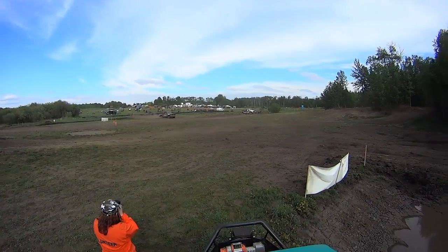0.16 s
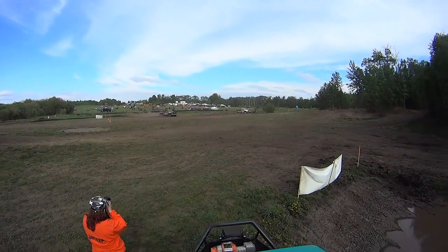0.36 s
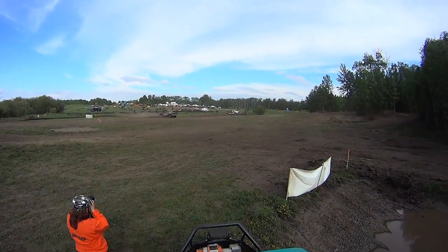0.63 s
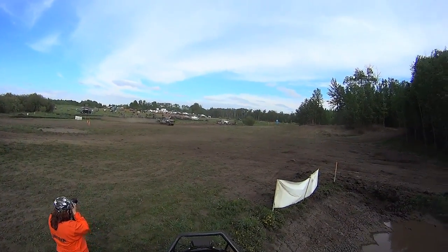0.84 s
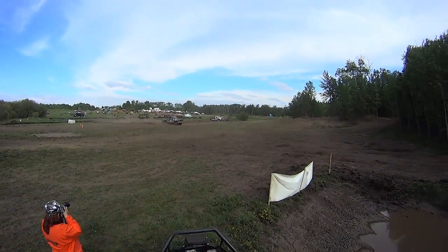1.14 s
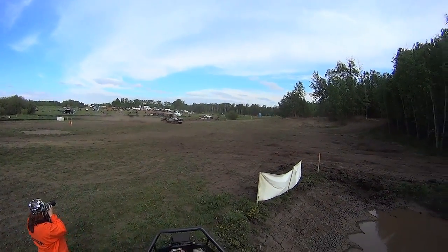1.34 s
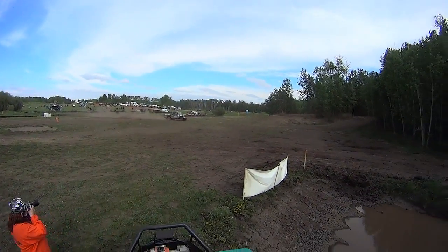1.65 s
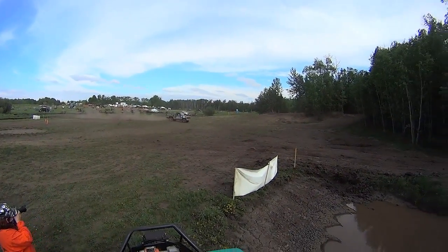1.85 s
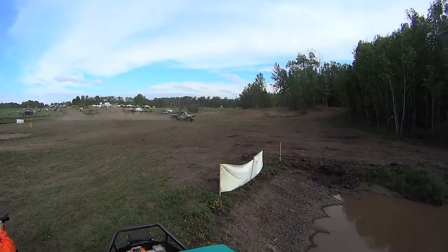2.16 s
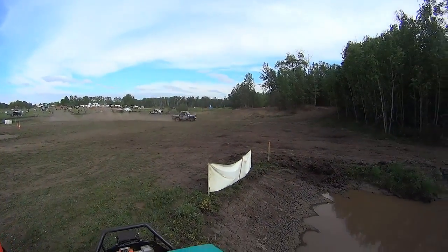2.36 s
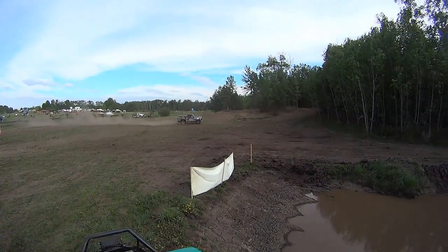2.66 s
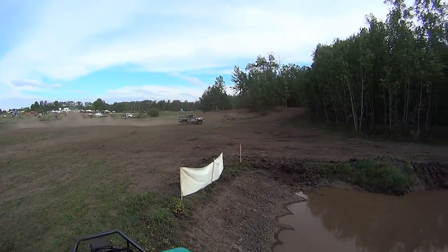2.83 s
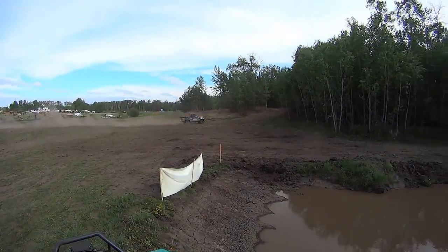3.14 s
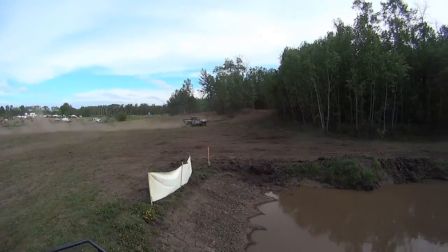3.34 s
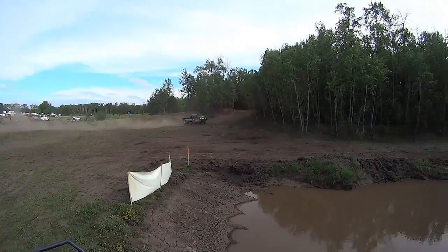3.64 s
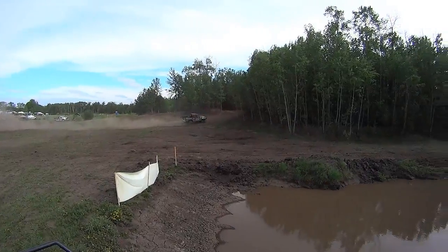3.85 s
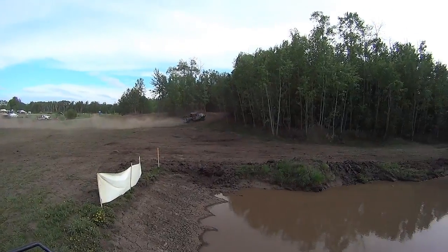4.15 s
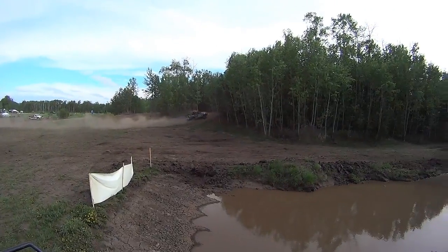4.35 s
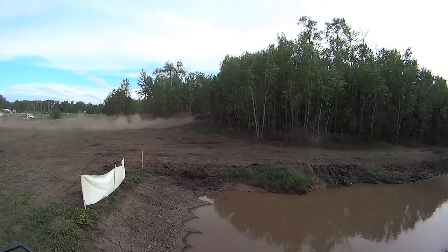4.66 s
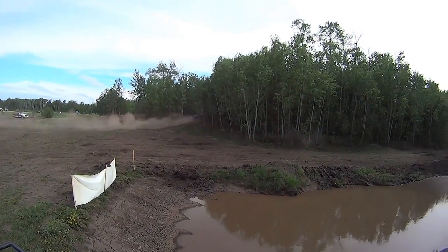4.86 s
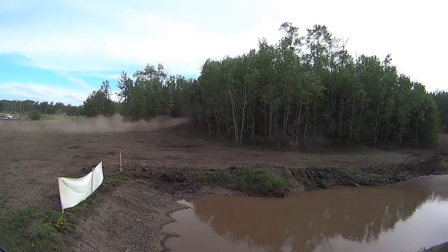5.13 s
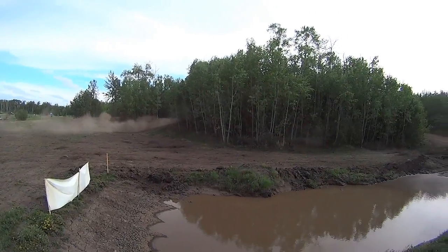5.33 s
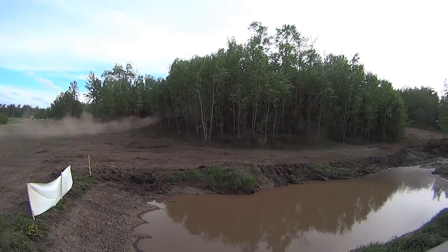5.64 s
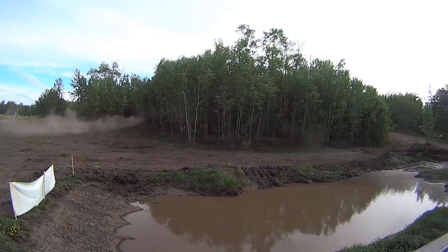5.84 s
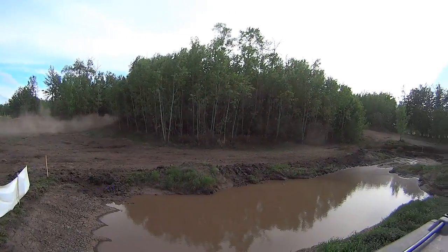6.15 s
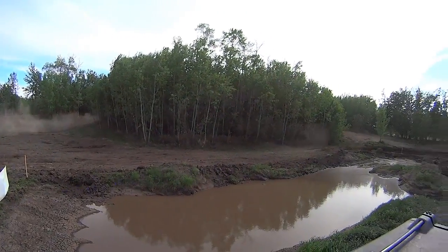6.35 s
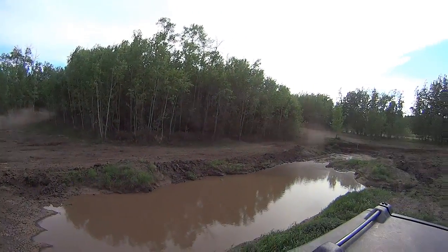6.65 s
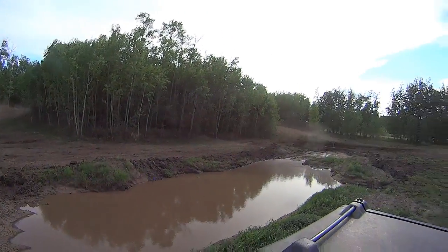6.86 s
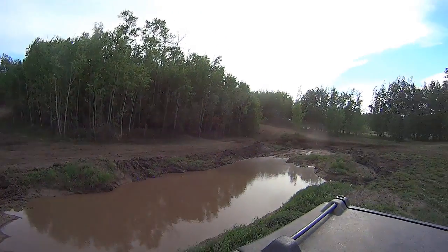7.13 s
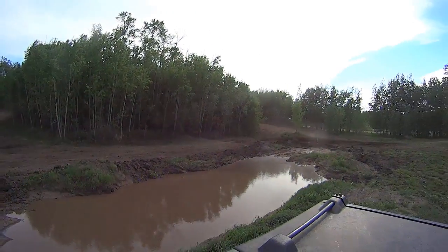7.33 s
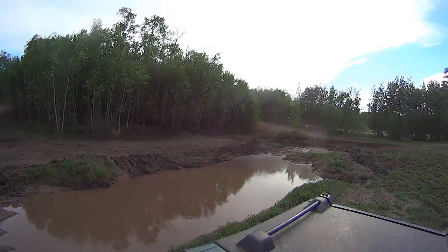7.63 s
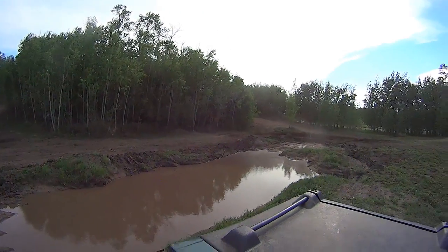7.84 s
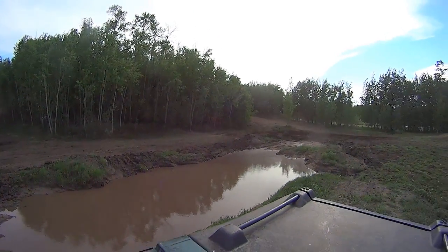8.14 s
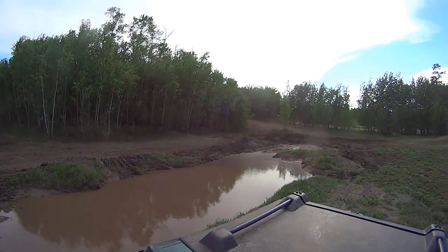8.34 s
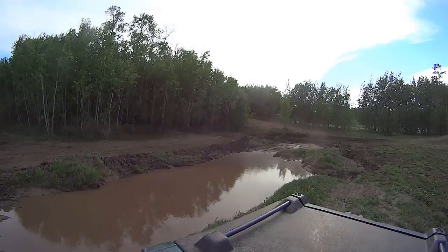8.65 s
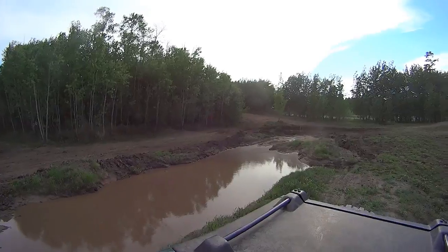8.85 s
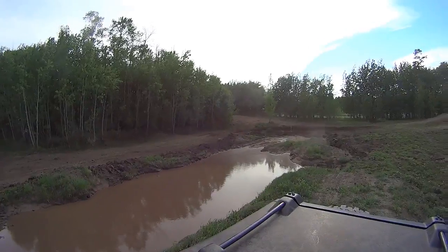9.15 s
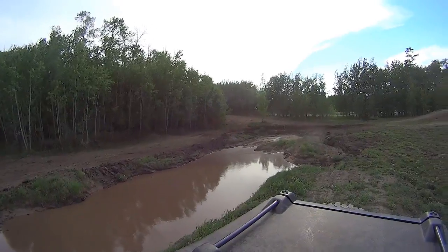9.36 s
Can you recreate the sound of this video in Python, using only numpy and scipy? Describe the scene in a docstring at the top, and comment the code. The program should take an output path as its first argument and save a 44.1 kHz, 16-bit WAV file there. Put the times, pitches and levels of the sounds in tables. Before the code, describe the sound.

A distant off-road engine revs loudly, eases briefly with a faint whine, and bursts back with sharp exhaust barks. It then lifts, sinking in pitch with a short weak push, and runs on muffled behind trees until it fades. The sound is coloured and boxy, through a closed stereo housing, with quiet hiss, several bumps on the casing, and late scraping and rumbling from a hand.

```python
"""Across a field beside a grove, a big off-road race engine revs, lifts and revs again, then runs on by the trees.
Its low drone is a stack of wavering tones; its rasp is noise pulsed by the exhaust puffs, plus a growl.
Two microphone ports in a closed housing colour the rasp; a steady bed of air and hiss lies underneath.
Knocks ring and thud on the housing, a faint whine arches once, and near the end a hand rubs the housing."""
import sys
import numpy as np
from scipy import signal
from scipy.fft import rfft, irfft, next_fast_len
from scipy.io import wavfile
from scipy.ndimage import uniform_filter1d

SR = 44100
rng = np.random.default_rng(int(sys.argv[2]) if len(sys.argv) > 2 else 0)


def put_to_file(sound):
    """Save the sound as 16-bit audio at rate SR, in the file named by the first command-line argument."""
    columns = np.atleast_2d(sound).T  # one column per channel
    safe = np.clip(columns, -1, 1)
    whole_steps = np.round(safe * 32767)
    wavfile.write(sys.argv[1], SR, whole_steps.astype(np.int16))


N = 418509  # length in samples
SIZE = next_fast_len(N)
BINS = np.fft.rfftfreq(SIZE, 1 / SR)  # frequencies of the whole-length spectrum, Hz

# engine speed; every cylinder fires once a cycle: t/s, full cycles per second/Hz
ENGINE_SPEED = [(0.0, 22.52), (0.75, 24.13), (0.93, 25.41), (1.42, 25.28), (1.52, 23.96), (1.65, 24.47),
                (1.79, 23.04), (1.93, 20.03), (2.14, 18.65), (2.28, 21.25), (2.5, 21.96), (2.63, 23.63),
                (2.77, 24.38), (2.85, 25.23), (2.94, 23.91), (3.06, 24.72), (3.2, 24.02), (3.34, 23.74),
                (3.47, 19.82), (3.54, 19.06), (3.68, 19.96), (3.82, 19.92), (3.9, 18.92), (4.08, 18.31),
                (4.18, 20.0), (4.4, 19.39), (4.6, 17.28), (4.95, 16.05), (5.08, 17.36), (5.2, 17.15),
                (5.45, 18.6), (5.75, 17.87), (5.92, 15.97), (6.1, 17.32), (6.4, 19.61), (7.3, 20.33),
                (8.15, 21.19), (8.5, 20.98)]
# pushes on the throttle with coasting between: t/s, rasp level/dB before its colouring, drone level/dB
THROTTLE_LEVELS = [(0.0, -35.5, -36.5), (0.28, -29, -33), (1.15, -25.5, -31), (1.3, -26, -29),
                   (1.55, -35, -29), (1.82, -40.5, -32.5), (1.95, -39.5, -43.5), (2.2, -44, -39.5),
                   (2.3, -48, -36), (2.5, -45.5, -39), (2.66, -29, -30), (3.05, -25.5, -28),
                   (3.33, -34.5, -32.5), (3.42, -44.5, -43.5), (3.85, -46.5, -44.5), (4.41, -56, -49.5),
                   (4.9, -58, -46.5), (5.05, -42, -42.5), (5.34, -42, -46), (5.45, -55, -55),
                   (5.72, -60.5, -50), (6.0, -68.5, -59), (6.1, -50, -47), (6.2, -41, -46.5),
                   (6.8, -36, -43.5), (8.2, -37, -44), (8.42, -42, -35.5), (8.7, -52.5, -51),
                   (8.9, -48, -45), (9.1, -56, -34), (9.49, -66, -44)]
# how alike the ports hear the engine: f/Hz, likeness/1 (below zero they move in opposition)
PORT_LIKENESS = [(105, .98), (135, .9), (240, .45), (400, .15), (700, .35), (950, .55), (1300, .96),
                 (2450, .95), (2750, .5), (3150, .75), (3650, -.8), (4200, -.1), (4750, .92), (5250, .9),
                 (5700, -.75), (7000, -.6), (9000, .2)]
# which port hears the engine louder: f/Hz, left minus right/dB
PORT_LEAN = [(60, 0), (110, -0.5), (190, -1.5), (340, -1.5), (600, 3), (1070, 5.5), (1500, 4.5), (1910, 6),
             (2450, 7), (2830, -8), (3150, 1.5), (3550, 10), (4300, -2), (6040, 0), (10700, -2)]


def gain_of(db):
    """Turns decibels into a factor on the sound wave."""
    return 10 ** (np.asarray(db) / 20)


def evened(x):
    """Scales a signal to an average strength (rms) of 1."""
    return x / np.sqrt(np.mean(x ** 2) + 1e-20)


def read(points, hz):
    """Reads a frequency table between its points, on a log-frequency axis."""
    f, value = np.transpose(points)
    return np.interp(np.log(hz + 1), np.log(f + 1), value)


def columns(rows, t):
    """Reads every column of a time table at the times t."""
    s, *rest = np.transpose(rows)
    return [np.interp(t, s, c) for c in rest]


def drift(hz):
    """Slow random wander of rms 1: noise smoothed so that little faster than hz remains."""
    step = 64  # samples between the coarse points
    keep = np.exp(-2 * np.pi * hz * step / SR)
    noise = rng.standard_normal(N // step + 2)
    coarse = signal.lfilter([1], [1, -2 * keep, keep * keep], noise)
    return evened(np.interp(np.arange(N) / step, np.arange(len(coarse)), coarse))


def filtered(x, gain):
    """Makes each frequency louder or softer by its own gain, over the whole length."""
    return irfft(rfft(x, SIZE) * gain, SIZE)[..., :N]


def port_pair(a, b, same, lean_db=0):
    """The ports share part of a sound, later at the right; the right port also has a part of its own."""
    # delay of the shared part at the right port: f/Hz, lag/rad
    right_lag = [(60, 0), (250, .6), (780, 1.4), (1030, .1), (1500, .3), (1750, .7), (2300, .15),
                 (3100, .7), (4700, .5), (5000, 0)]
    a, b, same = rfft(a, SIZE), rfft(b, SIZE), np.clip(same, -1, 1)
    shared = same * a * np.exp(-1j * read(right_lag, BINS))
    right = shared + np.sqrt(1 - same ** 2) * b
    return irfft([a * gain_of(lean_db / 2), right * gain_of(-lean_db / 2)], SIZE)[:, :N]


def by_place(t):
    """The trees change the rasp: 1.25 kHz dB, top treble dB, bark depth and 1.5 kHz dB at the times t."""
    # where the truck is: t/s, place/1 (0 open field, 1 edge of the grove, 2 fully behind)
    path = [(3.6, 0.04), (4.2, 1.13), (6.1, 1.03), (6.4, 1.1)]
    # rows open, edge, behind: 1.25 kHz level/dB, top treble level/dB, bark depth/1, 1.5 kHz level/dB
    place_colour = [(-5, 15.5, 0.52, 2), (14, -4, 0.34, 3), (-23.5, 10, 0, -21.5)]
    place = columns(path, t)[0]
    return [np.interp(place, [0, 1, 2], c) for c in np.transpose(place_colour)]


def turns():
    """Engine cycles counted since the start: the running sum of the engine speed."""
    return np.cumsum(columns(ENGINE_SPEED, np.arange(N) / SR)[0]) / SR


def drone(size=16):
    """Exhaust orders, whole multiples of the cycle rate, sound as wavering tones of changing balance."""
    # orders heard as tones: multiple of the cycle rate/1
    orders = [3, 4, 5, 6, 7, 8, 9, 10, 11, 12, 13]
    # balance of these orders in each named stage of the drive: relative level/dB per order
    stage_balance = { "pulling away": [-37, -36, -7, -3.5, -1.5, -2.5, -3, -14, -7.5, -13, -22], "flat out":
                     [-36, -38, -0.5, -5.5, -5.5, -2, -4, -16, -11.5, -21.5, -25], "coasting": [-21, -16,
                     -3.5, -0.5, -8, -36, -8, -2, -11, -20, -9], "coasting again": [-16, -16, -2.5, -2, -6,
                     -20, -8, -8.5, -10.5, -17, -11.5], "picking up": [-25, -27, -6, -3.5, -8.5, -12.5, -12,
                     -14, -8.5, -16, -23], "swinging to the grove": [-26, -17, -3, -5, -1, -14, -9, -9, 1,
                     0, -12], "slowing at the edge": [-25, -27, -10, -10, 1, 2.5, -15, -19, -12, -10, -11],
                     "short push": [-28, -23, -2, -1, -1, -17, -20, -20, -5, -31, -21], "coasting far":
                     [-15, -19, -16, 3, -13, -22, -28, -19, -25, -27, -27], "behind the grove": [-30, -27,
                     -2, -15.5, -11, -13.5, -5, -12, -2.5, -12.5, -11]}
    # when each stage holds; the balance blends over the gaps: start/s, end/s, stage name (in the last stage, so
    # named, the truck is only just past the edge of the grove)
    drive_stages = [(0, .6, "pulling away"), (.9, 1.7, "flat out"), (1.92, 2.17, "coasting"),
                    (2.28, 2.52, "picking up"), (2.68, 3.35, "flat out"), (3.47, 4.05, "coasting again"),
                    (4.17, 4.42, "swinging to the grove"), (4.58, 4.96, "slowing at the edge"),
                    (5.07, 5.4, "short push"), (5.55, 6.1, "coasting far"),
                    (6.22, 9.49, "behind the grove")]
    t = np.arange(0, N, size) / SR  # bass needs only a coarse time grid
    cycle = turns()[::size]
    speed = columns(ENGINE_SPEED, t)[0]
    balance = [(s, *stage_balance[stage]) for start, end, stage in drive_stages for s in (start, end)]
    out, power = 0, 0
    for k, db in zip(orders, columns(balance, t)):
        phase = 2 * np.pi * (k * cycle + rng.random()) + .12 * drift(6)[::size]
        lead = np.arccos(read(PORT_LIKENESS, k * speed))  # less alike: further apart in phase
        lean_db = read(PORT_LEAN, k * speed)
        left = np.cos(phase) * gain_of(lean_db / 2)
        right = np.cos(phase - lead) * gain_of(-lean_db / 2)
        out = out + gain_of(db + 1.3 * drift(4)[::size]) * np.array([left, right])
        power = power + gain_of(db) ** 2 / 2
    fade = np.clip((8.55 - t) / 0.3, 0, 1)  # the engine note dies away by the grove
    out = out / np.sqrt(power) * gain_of(columns(THROTTLE_LEVELS, t)[1]) * fade
    return signal.resample_poly(out, size, 1, axis=1)[:, :N]


def puffs():
    """Gas flow at the pipes: eight uneven firings a cycle, one bank louder, and single sharp barks."""
    # share of each cylinder in the bark, in firing order: level/dB at full bark depth
    cylinder_share = [0, -1.5, -7, -12, -13, -16, -7, -3]
    # sharp barks that stand out: t/s, level/dB
    sharp_barks = [(0.44, -35), (0.886, -24), (1.285, -27.5), (1.908, -37), (2.58, -34), (2.663, -24),
                   (2.713, -19.5), (2.912, -43), (3.085, -51), (3.118, -27), (3.159, -22.5), (3.431, -35),
                   (3.468, -31), (3.721, -45), (3.773, -34.5), (3.832, -35), (3.876, -43), (3.927, -38.5),
                   (4.195, -43), (5.045, -46), (5.142, -43), (5.218, -39), (5.33, -49)]
    t = np.arange(N) / SR
    depth = by_place(t)[2]
    first_firing = 0.18  # place in the firing order at the start
    firing = 8 * (turns() + 1) + first_firing + 0.056 * drift(21)
    index = firing.astype(int)
    uneven_db = 1.8 * rng.standard_normal(index.max() + 1)
    puff_db = depth * (np.take(cylinder_share, index % 8) + uneven_db[index])
    pulse = 1 + depth * np.exp(-(firing % 1) / .35)  # each puff starts sharply and sinks
    flow = uniform_filter1d(gain_of(puff_db) * pulse, 12)
    # even out the strength over a sixth of a second, then follow the throttle
    flow *= gain_of(columns(THROTTLE_LEVELS, t)[0]) / np.sqrt(uniform_filter1d(flow ** 2, SR // 6))
    bark = np.exp(-t[:1500] / 0.0075) * np.minimum(t[:1500] / .0015, 1)
    for s, db in sharp_barks:
        flow[round(s * SR):][:1500] += gain_of(db) * bark
    return flow


def growl(first=14, count=26):
    """Upper exhaust orders: one cycle of pressure, repeated at engine speed and following the throttle."""
    cycle, k = np.arange(1025) / 1024, np.arange(count)[:, None] + first
    shapes = []
    for _ in range(2):  # one pressure shape for each port
        strength = rng.rayleigh(1, k.shape) / k
        waves = strength * np.cos(2 * np.pi * (k * cycle + rng.random(k.shape)))
        shapes.append(waves.sum(0))
    position = (turns() + .002 * drift(5)) % 1
    t = np.arange(N) / SR
    level = gain_of(columns(THROTTLE_LEVELS, t)[0] - 7) * by_place(t)[2]  # trees blur it
    return level * evened(np.array([np.interp(position, cycle, shape) for shape in shapes]))


def smooth_noise(shape, hz_bins, frames):
    """Random patches over frequency and time, smoothed along both and scaled to rms 1."""
    across = uniform_filter1d(rng.standard_normal(shape), size=hz_bins, axis=0)
    return evened(uniform_filter1d(across, size=frames, axis=1))


def path_colour(jets):
    """The turning truck, ground echo, trees and random patches keep changing the balance of the rasp."""
    # as the truck turns: t/s, ground-echo ridge f/Hz, ridge level/dB, below 550 Hz level/dB,
    # 550-1000 Hz level/dB, near 1.4 kHz level/dB, near 5 kHz level/dB
    turning = [(0.05, 2080, 1.5, 6.5, 5, 15, -2), (0.7, 2580, 6.5, -3.5, 1, 11, 2),
               (1.3, 2410, 2.5, -8, 4, 9, 5), (1.6, 3060, 5.5, 0, 5.5, 7, 1),
               (2.05, 3340, 3, -4, 0.5, 22, -4), (2.4, 2720, 2.5, 4.5, 7.5, 22, -5.5),
               (2.8, 3200, 5.5, -5, -1.5, -5, -9), (3.05, 2550, 5, -5, -5, -15, -4),
               (3.35, 2900, 4, 3, 1, 8, 6.5), (3.8, 2580, 8, 0, -3, 8, -4.5),
               (4.5, 2150, 2, 18, 12.5, 12, -10), (5.0, 2070, 4, 6, 7.5, 0, -10),
               (5.3, 2550, 5, 6.5, 10.5, 5, 1.5), (5.8, 1960, 1, 3.5, -5, -8, -7),
               (6.3, 2660, 6.5, 0.5, -2, -2, 0), (7.0, 2730, 0.5, -4, -5, -7, -3.5),
               (7.8, 2900, 2, -1.5, -4, -14, -1.5), (8.35, 1800, 2.5, -4.5, 6, -7, -1.5),
               (8.55, 1907, 4, 4, 20, 6, -13), (8.95, 1960, 4.5, 2, 0, 1, -4.5)]
    # change of the rasp above 8 kHz: t/s, level/dB
    treble_level = [(0, -3), (1.4, -1.5), (2.5, -3), (2.85, -1), (3.0, 8), (3.08, -6), (3.2, 8.5), (3.9, 2),
                    (5.2, 1), (6.2, 9), (8.4, 12.5), (9.4, 4)]
    # change of the housing's main ring near 1.5 kHz: t/s, level/dB
    main_ring = [(0, -12.5), (.6, -2), (.95, -9), (1.5, -8.5), (2.0, -7.5), (2.8, 6), (3.6, -1.5),
                 (5.7, 2.5), (6.3, -1), (7.4, -2.5)]
    hz, t, z = signal.stft(jets, SR, nperseg=512)
    ridge_hz, ridge_db, bass_db, low_db, bell_db, high_db = columns(turning, t)
    main_db, top_db, bark_depth, ring_db = by_place(t)
    hz = hz[:, None] + 1

    def below(edge):
        return 1 / (1 + (hz / edge) ** 12)

    def above(edge):
        return 1 / (1 + (edge / hz) ** 12)

    shift_db = bass_db * below(540) + low_db * above(613) * below(1035)
    shift_db += bell_db * above(1360) * below(1420)
    shift_db += main_db * above(1116) * below(1440) + ring_db * above(1370) * below(1710)
    shift_db += high_db * above(4130) * below(5950)
    shift_db += (top_db + columns(treble_level, t)[0]) * above(8570)
    shift_db += ridge_db * np.exp(-((hz - ridge_hz) / 300) ** 2)  # direct sound and ground echo add up here
    shift_db += columns(main_ring, t)[0] * np.exp(-((hz - 1490) / 110) ** 2)
    shift_db += 2.25 * smooth_noise(z.shape[1:], 3, 20)  # random patches of the rasp grow louder and softer
    shift_db += 2.2 * bark_depth * smooth_noise(z.shape[1:], 6, 4) * above(1000)  # quick changes of colour
    return signal.istft(z * gain_of(shift_db), SR, nperseg=512)[1][:, :N]


def rasp():
    """Turbulent noise carried by the puffs, scattered by trees and banks, heard through the housing."""
    # basic colour of the rasp: f/Hz, relative level/dB
    rasp_colour = [(150, -15.5), (300, -16.5), (430, -23.5), (760, -14), (1260, -23), (1455, 2), (1525, 3),
                   (1700, -3), (2080, -12), (3230, -4.5), (3760, -14.5), (5090, -13), (6300, -15),
                   (9500, -38.5), (11200, -59)]
    # resonances of the housing: f/Hz, width/Hz, lift/dB
    housing_peaks = [(450, 167, 15), (663, 55, 8.5), (1127, 286, 14.5), (2052, 210, 13), (2359, 230, 9),
                     (2898, 107, 3.5), (4140, 170, 5.5), (4965, 233, 12.5), (7490, 80, 7)]
    noise = puffs() * rng.standard_normal((2, N))
    jets = filtered(noise, np.where(BINS < 950, .9, 1)) + growl()
    t = np.arange(SR // 2) / SR
    tail = rng.standard_normal((2, SR // 2)) * gain_of(-60 * t / 0.16)  # echoes sink 60 dB in 0.16 s
    tail /= np.linalg.norm(tail[0])
    jets = jets + gain_of(-10) * signal.fftconvolve(jets, tail, axes=1)[:, :N]
    a, b = path_colour(jets)
    lift_db = sum(db / (1 + (2 * (BINS - f) / width) ** 2) for f, width, db in housing_peaks)
    colour = gain_of(read(rasp_colour, BINS) + lift_db)
    band = (BINS > 2300) & (BINS < 3600)  # the strength in this band sets the overall scale
    colour /= np.sqrt(np.sum(colour[band] ** 2) / len(BINS)) * gain_of(4.)
    return filtered(port_pair(a, b, read(PORT_LIKENESS, BINS), read(PORT_LEAN, BINS)), colour)


def floor():
    """Far air and microphone hiss: gently wavering noise, nearly alike at both ports in the bass."""
    # colour of the background: f/Hz, relative level/dB
    air_colour = [(15, -53), (25, -52), (97, 4.5), (142, -5), (365, -13), (1240, -15), (1490, -9),
                  (2240, -17.5), (3830, -24.5), (5070, -24), (11200, -29.5), (14500, -71), (22000, -120)]
    a, b = rng.standard_normal((2, N)) * gain_of(.7 * drift(1.5))
    pair = port_pair(a, b, np.where(BINS < 150, .95, .5))
    return gain_of(-50.5) * evened(filtered(pair, gain_of(read(air_colour, BINS))))


def knocks():
    """The shell rings, a low thud follows and rebounds once, with a twist of opposite sign at the ports."""
    # knocks on the housing: t/s, level/dB, thud f/Hz, ring against thud/dB,
    # shift of the upper ring/dB, left minus right/dB
    knock_list = [(0.132, -11, 215, -3.5, -10, 0), (0.475, -18, 202, -3.5, -9, -4),
                  (0.61, -14, 259, -0.5, -9, -5.5), (0.71, -17, 130, -3, -16, -2),
                  (1.152, -29, 280, -10, -10, 3), (1.619, -30.5, 280, -1, -10, -1),
                  (1.851, -34, 133, -2, -6, 1), (3.955, -32, 258, -16, -8, -2),
                  (4.085, -28, 215, -26, -8, -4), (7.811, -35, 262, 1, -10, 2),
                  (8.009, -36, 235, -7, -6, -12), (8.196, -28, 202, 12, 13, 3),
                  (8.212, -14, 253, 7.5, 2, 1.5), (8.591, -26, 172, -28, -4, -6),
                  (8.649, -25, 176, -24, -4, -1), (8.774, -43, 184, 1, -6, 12),
                  (9.023, -30.5, 220, 8, 11, 3), (9.228, -40, 108, -3, -8, -4),
                  (9.459, -35, 153, -27, -9, -4)]
    # ring of the knocked housing: f/Hz, level/dB, time to sink 60 dB/s
    shell_modes = [(353, -6, 0.018), (600, 3, 0.022), (780, 1, .018), (980, -3, 0.014), (1204, -4, 0.016),
                   (1520, 5, 0.022), (1850, 3, 0.016), (2200, -1, .012)]
    out, t = np.zeros((2, N + 3000)), np.arange(3000) / SR
    chance = rng.standard_normal((len(knock_list), 3, 700))
    modes = np.array([gain_of(db - 60 * t / t60) * np.sin(2 * np.pi * hz * t) for hz, db, t60 in shell_modes])
    upper = np.array(shell_modes)[:, :1] > 1100
    lag_s, rebound_s, rebound_db, thud_t60_s = .002, .016, -6.5, .04
    late = np.maximum(t - [[lag_s], [lag_s + rebound_s]], 0)  # time since the thud and since its rebound
    swing = gain_of([[0], [rebound_db]] - 60 * late / thud_t60_s) * (1 - np.exp(-late / 0.00037))
    jolt = t / .001 * np.exp(1 - t / .001)  # the microphone capsules are shoved apart
    for (s, db, hz, click_db, upper_db, pan_db), noise in zip(knock_list, chance):
        thud = (np.sin(2 * np.pi * hz * late) * swing).sum(0)
        twist = (np.sin(2 * np.pi * 1.57 * hz * late) * swing).sum(0)
        contact = (noise[0] + .9 * noise[1:]) * np.exp(-t[:700] / .007)  # uneven touch of a few ms
        blow = uniform_filter1d(contact, size=12)
        blow = blow - uniform_filter1d(blow, size=90)  # the shell takes no slow push
        ring = (modes * gain_of(upper_db * upper)).sum(0)
        click = signal.fftconvolve(blow, ring[None], axes=1)[:, :len(t)]
        sound = thud + (.7 * twist + .25 * jolt) * [[1], [-1]]
        sound = sound + gain_of(click_db) * click / abs(click).max()
        out[:, round(s * SR):][:, :len(t)] += sound * gain_of([[db + pan_db / 2], [db - pan_db / 2]])
    return out[:, :N]


def whine():
    """One faint pure tone arches over the gear change, rising and falling, louder at the left."""
    # path of the tone: t/s, f/Hz, level/dB (rms)
    whine_path = [(2.21, 1030, -73), (2.24, 1010, -57), (2.3, 1068, -50), (2.34, 1070, -56),
                  (2.38, 1050, -60), (2.42, 1000, -73)]
    t = np.arange(N) / SR
    hz, db = columns(whine_path, t)
    heard = (t > whine_path[0][0]) * (t < whine_path[-1][0])
    tone = gain_of(db) * np.sin(2 * np.pi * np.cumsum(hz) / SR) * heard
    return np.sqrt(2) * tone * gain_of([[2.], [-2.]])


def strokes():
    """Scrape and rumble levels of the rubbing hand: each stroke grips, sags and lets go."""
    # strokes over the housing: start/s, length/s, scrape level/dB, rumble level/dB
    stroke_list = [(8.263, 0.19, -42, -36.5), (8.382, 0.23, -27, -37), (8.451, 0.021, -26, -63),
                   (8.592, 0.1, -32, -32), (8.686, 0.18, -41, -41.5), (8.815, 0.28, -50, -39),
                   (9.146, 0.248, -45.5, -38)]
    grip, let_go_s, sag_db = 0.22, 0.033, -4.5  # grip: share of the stroke in which it grows
    t, out = np.arange(N) / SR, np.zeros((2, N))
    for s, length, scrape_db, rumble_db in stroke_list:
        touch = np.clip(np.minimum((t - s) / (grip * length), (s + length - t) / let_go_s), 0, 1)
        sag = gain_of(sag_db * np.clip((t - s) / length, 0, 1))
        out += touch * sag * gain_of([[scrape_db], [rumble_db]])
    return out


def rub():
    """Skin slips over the shell in uneven grains: a scrape near its main resonance and a dull rumble."""
    # colour of the scrape: f/Hz, relative level/dB
    scrape_colour = [(590, -32), (1000, -20), (1380, -4.5), (1680, 8), (2230, -14), (5010, -52),
                     (7800, -74), (13200, -120)]
    # colour of the rumble: f/Hz, relative level/dB
    rumble_colour = [(24, -56), (40, -23), (161, -5), (374, -14), (679, -10.5), (1200, -23), (1560, -62),
                     (2640, -120)]
    light, heavy = strokes()
    grains = gain_of(2.9 * drift(43) + 2. * drift(250))
    a, b, c, d = rng.standard_normal((4, N)) * grains
    scrape = evened(filtered(port_pair(a, b, 0.96, lean_db=5.0), gain_of(read(scrape_colour, BINS))))
    c, d = np.array([c, d]) * gain_of(2. * drift(16))  # the palm presses in lumps
    rumble = evened(filtered(port_pair(c, d, 0.19), gain_of(read(rumble_colour, BINS))))
    return light * scrape + heavy * rumble


def scene():
    """Engine, background and handling add up at the two microphone ports."""
    return drone() + rasp() + floor() + knocks() + whine() + rub()


def record(dry):
    """The recorder has a band limit: a steep low-pass filter removes the highest treble."""
    edge_hz = 11280
    low_pass = signal.firwin(1023, edge_hz, window=("kaiser", 9), fs=SR)
    return signal.oaconvolve(dry, low_pass[None], "same")


dry = scene()
out = record(dry)
put_to_file(out)
```